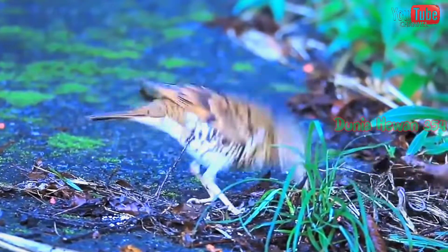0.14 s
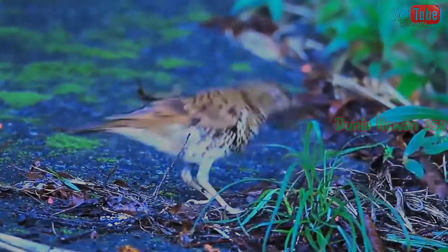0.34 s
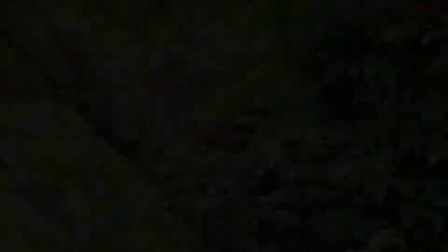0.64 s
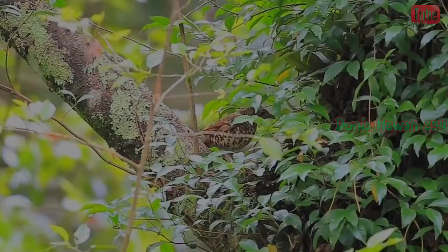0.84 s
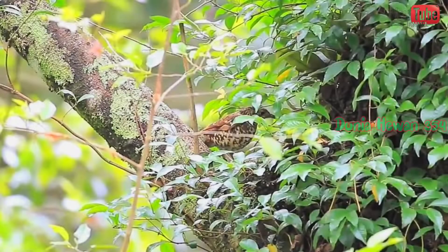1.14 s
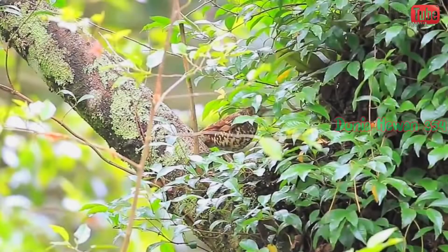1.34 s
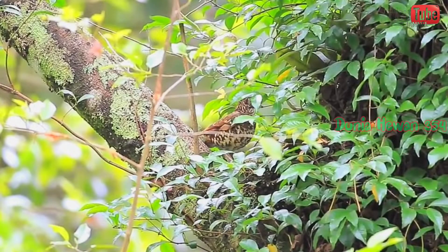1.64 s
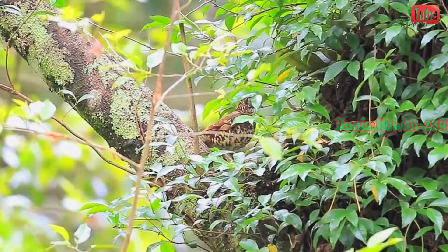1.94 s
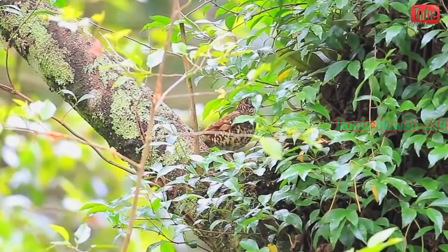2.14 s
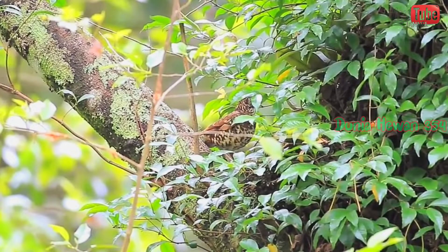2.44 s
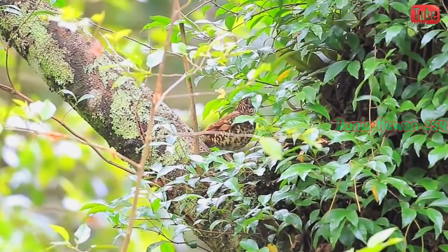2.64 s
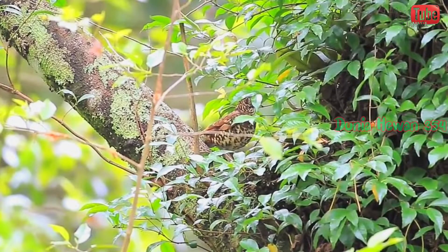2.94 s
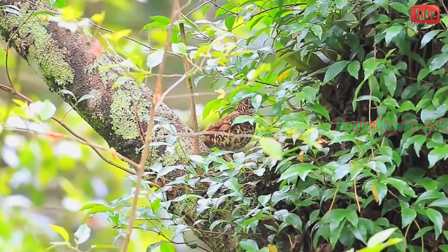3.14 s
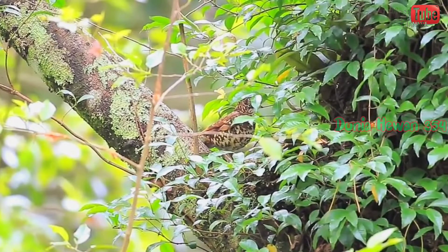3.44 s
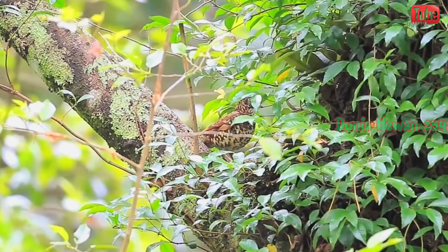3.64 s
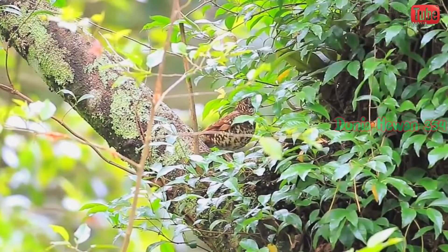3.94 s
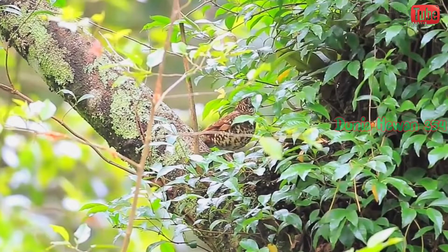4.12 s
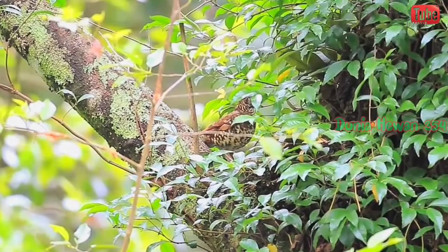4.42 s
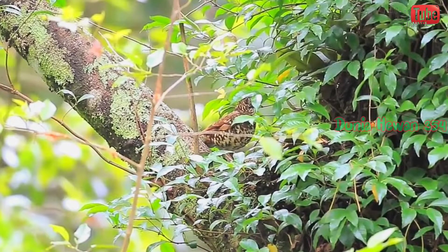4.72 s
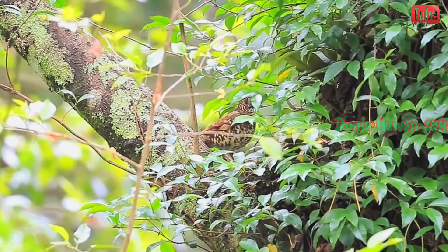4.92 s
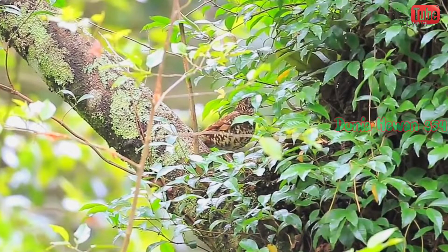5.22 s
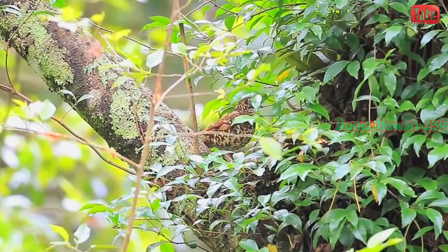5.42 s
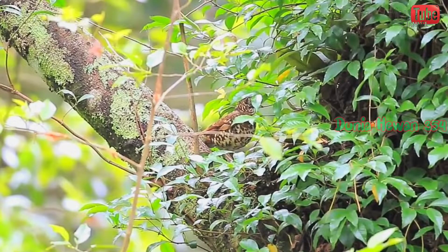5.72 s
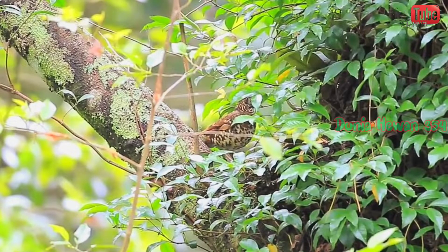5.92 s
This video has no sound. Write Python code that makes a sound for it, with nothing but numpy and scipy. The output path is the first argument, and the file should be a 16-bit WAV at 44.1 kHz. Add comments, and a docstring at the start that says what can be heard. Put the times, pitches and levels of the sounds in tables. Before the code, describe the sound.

Close on the left, a thrush sings six short phrases separated by pauses: clear sliding whistles, a rising note snapping into a throbbing fall, a buzz merging into a long high slide, a level whistle, a two-voiced duet and a thin rasp. Trunks and leaves scatter the notes. Soft air and a faint low drone lie beneath; the right channel is silent at first, then carries quiet air and distant falling chips.

```python
"""A thrush sings six short phrases in woodland, close by and on the left only; trunks and leaves scatter the song.
It opens with whistles over soft air and a faint drone; then the right side opens with quiet forest air
and faint, falling calls. The second phrase ends in a whip and a throbbing fall; in the third one side of
the syrinx buzzes into a high slide. A level whistle and a duet of the two sides follow, and a rasp ends it.
Voices are jittering near-sines with weak overtones and air hiss; air, rustles and bumps are shaped noise."""
import sys
import numpy as np
from scipy import signal
from scipy.fft import rfft, irfft, next_fast_len
from scipy.io import wavfile
from scipy.ndimage import uniform_filter1d, minimum_filter1d

SR = 44100
rng = np.random.default_rng(int(sys.argv[2]) if len(sys.argv) > 2 else 0)


def to_wav(sig):
    """Store sig (one row per channel, or 1-D mono) as 16-bit WAV at the path in sys.argv[1].

    Samples outside -1..1 are clipped; the rate is SR.
    """
    pcm = np.clip(np.atleast_2d(sig), -1, 1) * 32767
    pcm = np.round(pcm).astype(np.int16)
    wavfile.write(sys.argv[1], SR, pcm.T)  # frames by channels


N = 267687
T = np.arange(N) / SR  # time in seconds

# forest air on each side: hz, density_db_per_hz
LEFT_AIR = [(20, -72.5), (60, -78), (95, -74), (140, -79.5), (260, -79), (600, -80), (1200, -85),
            (2200, -87), (4000, -88.5), (7000, -95), (9000, -106), (12000, -121), (15000, -128)]
RIGHT_AIR = [(20, -103), (60, -89), (92, -79.5), (140, -91), (600, -93), (1200, -88.5), (2100, -88),
             (2700, -91.5), (3400, -109), (5500, -104), (7800, -106), (10000, -126), (15000, -137)]
# dull bumps on the left microphone: centre_s, half_length_s, level_db
DULL_BUMPS = [(0.772, 0.04, -40), (1.41, 0.023, -44), (2.327, 0.068, -51.5), (4.295, 0.031, -43),
              (4.49, 0.036, -51)]
# soft rustles in the leaves: centre_s, half_length_s, centre_hz, left_db, right_db
LEAF_RUSTLES = [(1.134, .03, 5500, -88, -58), (2.633, 0.022, 8950, -58, -74),
                (3.138, 0.052, 8680, -58, -75), (4.636, .006, 4500, -80, -55)]
# faint calls on the right, a chip and then a falling tail: chip_s, chip_top_hz, chip_db, tail_db
# (both levels before the blend of direct and scattered sound)
DISTANT_CALLS = [(.734, 5400, -37, -58), (2.196, 6200, -39, -41), (2.887, 6100, -38, -44),
                 (4.364, 5600, -57, -58), (5.392, 6400, -55, -61)]
# how the throat and open beak colour the overtones: hz, gain_db
BEAK_COLOUR = [(3000, 4), (5000, -2), (6800, 12.5), (8000, -1.5), (9000, 0), (11000, 1), (13500, -9),
               (15500, -15)]
# turbulent air that escapes with each note, before the note's own hiss_db: hz, density_db_per_hz
BREATH_HISS = [(300, -40), (2000, -49), (4500, -43.5), (6800, -36.5), (9800, -42.5), (11200, -53.5),
               (13500, -68.5)]
# one syrinx side buzzing into the high slide: start_s, length_s, centre_hz, peak_db
BUZZ_BURSTS = [(2.183, 0.025, 6460, -23), (2.206, 0.026, 6350, -11), (2.251, .030, 6150, -10),
               (2.302, .028, 6000, -13.5), (2.356, .028, 5670, -22.5), (2.418, .028, 5850, -17)]
# full whistles by name: contour rows of time_s, pitch_hz, level_db; then timbre of jitter_percent,
# second_harmonic_db, third_harmonic_db, hiss_db, woodland_echo_db, fourth_harmonic_db (re the third)
CONTOUR_WHISTLES = { "opening whistle": ([(0.087, 1894, -39.1), (0.106, 2360, -19.5), (0.143, 2567, -9.2),
                    (0.158, 2644, -2.3), (0.175, 2530, -5.3), (0.185, 2546, -4.4), (0.19, 2608, -26.0)],
                    (.25, -37.5, -51, -54, -20, 3)), "crest": ([(0.231, 2994, -27.7), (0.239, 3334, -9.1),
                    (0.263, 3535, -3.6), (0.278, 3380, -2.4), (0.307, 3262, -7.6), (0.31, 3438, -21.3)],
                    (.15, -33, -41, -53, -16, -22)), "long slide": ([(0.31, 3317, -12.7),
                    (0.315, 3261, -1.9), (0.34, 3291, -10.2), (0.356, 3258, -3.5), (0.369, 3228, -9.3),
                    (0.399, 3137, -8.5), (0.469, 3026, -13.7), (0.516, 2985, -25.5)],
                    (.15, -35, -45, -57, -17, -22)), "level whistle": ([(3.408, 1709, -29.4),
                    (3.416, 2549, -15.3), (3.422, 2903, -3.6), (3.432, 2998, -12.3), (3.447, 2907, 0.2),
                    (3.453, 2815, -5.5), (3.482, 2908, -1.8), (3.49, 2959, -15.2), (3.499, 3021, -8.4),
                    (3.505, 2954, -18.7)], (.12, -39.5, -39, -49, -11, -24)), }
# the other notes by name, each from one side of the syrinx, in four groups:
# timing: start_s, length_s
# pitch: first_hz, last_hz, arch_hz, scoop_hz, settling_s
# loudness: peak_db, rise_s, swell_db, fade_db
# timbre: jitter_percent, second_harmonic_db, third_harmonic_db, hiss_db, woodland_echo_db
GLIDE_NOTES = { "grace note": ((.221, .027), (4330, 3830, -75, 450, .002), (-4, .020, 20, 9),
               (.34, -23.5, -50, -31, -11.5)), "upper blip": ((.310, .018), (3720, 3760, 20, 0, .005),
               (-19, .008, 8, 3), (.5, -30, -50, -35, -10)), "rising whistle": ((1.1445, .060),
               (4560, 5400, -170, -2100, .003), (-12, .041, 19, 7), (.86, -24, -50, -25, -12.5)),
               "second rising voice": ((1.160, .036), (4480, 4900, -110, 0, .005), (-15, .027, 25, 2),
               (1.4, -15, -50, -43, -15)), "whip": ((1.204, .013), (4900, 2380, -600, 0, .005),
               (-1, .0075, 20, 12), (2.5, -26, -46, -28, -20)), "throbbing fall": ((1.216, .064),
               (1900, 1460, -130, 700, .010), (-9.3, .003, 0, 6.5), (2.2, -25, -36, -29, -22)),
               "high slide": ((2.194, .320), (7070, 6280, -55, 920, .029), (-6, .068, 19, 10),
               (.1, -22, -58, -36, -19.5)), "closing note": ((3.505, .026), (2950, 2640, 30, 0, .005),
               (-1, .005, 17, 10), (.5, -41, -43, -49, -10.5)), "upper flick": ((3.491, .036),
               (4120, 3540, 20, -100, .005), (-28, .010, 11, 1), (1.5, -24, -46, -22, -7)),
               "duet upper": ((4.401, .068), (3980, 4150, 175, -200, .006), (-14, .040, 23, 0),
               (.31, -33, -54, -37, -7)), "duet lower": ((4.443, .046), (3600, 3100, 90, -230, .006),
               (-8, .025, 26, 4), (.7, -38, -42, -34, -8.5)), "duet return": ((4.485, .052),
               (3700, 4290, 20, -500, .004), (-12.5, .035, 4, 3), (.8, -41, -54, -36, -4)),
               "rasp swoop": ((5.393, .034), (7850, 4450, 520, 0, .005), (-25, .020, 17, 3),
               (2.8, -24, -35, -17, -6)), "rasp climb": ((5.419, .036), (4750, 5400, -130, 0, .005),
               (-28, .008, 3, 7), (4, -17, -35, -18, -7)), "rasp lower": ((5.408, .142),
               (6400, 6400, 0, 600, .006), (-29.5, .045, 2, 0), (3.8, -17, -50, -42, -4)),
               "rasp upper": ((5.434, .114), (7600, 7250, 130, 0, .005), (-30.5, .015, 10, 7),
               (3.2, -24, -50, -25, -2)), }
# notes that throb, by name: first_dip_s, rate_hz, depth_db
NOTE_THROBS = {"throbbing fall": (1.226, 51, 16)}

RIGHT_OPENS_S = .615
TOP_HZ = 15400
WOOD_T60_S, WOOD_BUILD_S = .39, .004
LEAF_T60_S, LEAF_BUILD_S = .1, .0015
EASE_S = .002  # muscle inertia rounds the corners of a note
RELEASE_SHARE, RELEASE_DB = .2, 9  # a glide note dies down over its last part
BUZZ_RATE_HZ, BUZZ_SWEEP = 100, .24  # sweep as a share of the centre pitch
BUZZ_LIFT, BUZZ_LIFT_S = .022, .015  # peak pitch lift as a share, and the time to reach it
CHIP_HALF_S, CHIP_BEND_HZ = .009, 350
TAIL_DELAY_S, TAIL_HZ = .014, 4950
TAIL_SAG_HZ_PER_S, TAIL_FADE_DB_PER_S = 12000, 270


def undb(db):
    """Decibels to gain."""
    return 10 ** (np.asarray(db) / 20)


def noise(spectrum):
    """White noise shaped to a spectrum given in dB per Hz, drawn on a log frequency axis."""
    hz, db = np.transpose(spectrum)
    f = np.maximum(np.fft.rfftfreq(N, 1 / SR), 1)
    shape = undb(np.interp(np.log(f), np.log(hz), db))
    return irfft(rfft(rng.standard_normal(N)) * shape, N) * np.sqrt(SR / 2)


def band(centre_hz, width_hz):
    """Noise in a bell-shaped band, rms 1; centred on zero it is a random wander."""
    size = next_fast_len(N, real=True)
    f = np.fft.rfftfreq(size, 1 / SR)
    bell = np.exp(-.5 * ((f - centre_hz) / width_hz) ** 2)
    x = irfft(rfft(rng.standard_normal(size)) * bell, size)[:N]
    return x / x.std()


def swell(centre_s, half_s):
    """A smooth rise and fall around a moment."""
    return np.exp(-((T - centre_s) / half_s) ** 2)


def ease(x):
    """Round the corners of a pitch or amplitude curve."""
    return uniform_filter1d(x, max(int(EASE_S * SR), 1))


def air(spectrum):
    """Steady forest air: shaped noise that sways slightly in level."""
    sway_db = .25 * band(0, 2)
    return noise(spectrum) * undb(sway_db)


def drone():
    """A faint low drone: noise in so narrow a band that its level comes and goes."""
    return undb(-62) * band(94, 5)


def bumps():
    """Soft thuds: very low noise under brief swells."""
    level = sum(undb(db) * swell(s, half) for s, half, db in DULL_BUMPS)
    return band(25, 16) * level


def rustles():
    """Leaves brushing: brief swells of high noise, shared between both sides."""
    out = 0
    for s, half, hz, left_db, right_db in LEAF_RUSTLES:
        sides = undb([[left_db], [right_db]])
        out = out + swell(s, half) * band(hz, 2200) * sides
    return out


def echoes(x, t60_s, build_s):
    """Many small echoes from trunks and leaves: a noise tail that builds up and dies away."""
    t = T[T < .9]
    envelope = undb(-60 * t / t60_s) * (1 - np.exp(-t / build_s))
    tail = rng.standard_normal(len(t)) * envelope
    return signal.fftconvolve(x, tail / np.linalg.norm(tail))[:N]


def woodland(x):
    """The long answer of the wood."""
    return echoes(x, WOOD_T60_S, WOOD_BUILD_S)


def foliage(x):
    """The quick smear from nearby leaves."""
    return echoes(x, LEAF_T60_S, LEAF_BUILD_S)


def far_calls():
    """Thin arched sine chips, each with a tail sliding down in pitch, blurred by the leaves in between."""
    calls, waver = 0, 1 + .012 * band(0, 330)
    for s, top_hz, chip_db, tail_db in DISTANT_CALLS:
        age = np.maximum(T - s - TAIL_DELAY_S, 0)
        arch_hz = top_hz - CHIP_BEND_HZ * ((T - s) / CHIP_HALF_S) ** 2
        chip_hz = np.maximum(arch_hz, TAIL_HZ)
        hz = np.maximum(chip_hz - TAIL_SAG_HZ_PER_S * age, 0)
        chip = undb(chip_db) * swell(s, CHIP_HALF_S)
        tail = undb(tail_db - TAIL_FADE_DB_PER_S * age) * (1 - np.exp(-age / .004))  # 4 ms attack
        calls = calls + (chip + tail) * np.sin(2 * np.pi * np.cumsum(hz * waver) / SR)
    return undb(-4) * calls + undb(-5) * foliage(calls) + undb(-14) * woodland(calls)


def syrinx(hz, second_db, third_db, fourth_db=-13):
    """A vibrating membrane: nearly a sine, with weak overtones coloured by the throat and beak."""
    phase = 2 * np.pi * np.cumsum(hz) / SR
    beak_hz, beak_db = np.transpose(BEAK_COLOUR)
    # the fourth and fifth harmonics step on from the third
    harmonics_db = [second_db, third_db, third_db + fourth_db, third_db + 2 * fourth_db]
    out = np.sin(phase)
    for k, db in enumerate(harmonics_db, 2):
        gain = undb(db + np.interp(k * hz, beak_hz, beak_db))
        out = out + gain * np.sin(k * phase) * (k * hz < SR / 2)
    return out


def buzz():
    """Bursts of tiny, uneven upward chirps; also returns how far each chirp chokes the whistling side."""
    hz, loud, choke = np.zeros((3, N))
    uneven = .09 * band(0, 40)  # in chirp cycles
    rough = .028 * band(0, 600)  # as a share of the pitch
    for start, length, centre, db in BUZZ_BURSTS:
        on = (T >= start) & (T < start + length)
        age = T[on] - start
        cycle = (age * BUZZ_RATE_HZ + uneven[on]) % 1
        opening = np.sin(np.pi * cycle) ** 2
        burst = np.sin(np.pi * age / length) ** .9
        hz[on] = centre * (1 + BUZZ_SWEEP * (cycle - .5) + rough[on])
        loud[on] = undb(db) * opening * burst
        choke[on] = np.cos(np.pi * (cycle - .3)) ** 2 * np.sqrt(1 - age / length)
    chirps = loud * syrinx(hz, -19, -np.inf)  # second harmonic only
    return chirps, uniform_filter1d(choke, size=90)


def lift():
    """Each buzz pushes the whistling side sharp by a share of its pitch, which then sinks back."""
    ages = [np.maximum(T - start, 0) / BUZZ_LIFT_S for start, *_ in BUZZ_BURSTS]
    return BUZZ_LIFT * np.max([age ** 2 * np.exp(2 * (1 - age)) for age in ages], axis=0)


def gesture(contour):
    """Pitch and amplitude drawn through a contour, corners eased by the inertia of the muscles."""
    s, hz, db = np.transpose(contour)
    loud = undb(np.interp(T, s, db)) * (T >= s[0]) * (T <= s[-1])
    return ease(np.interp(T, s, hz)), ease(loud)


def note(timing, pitch, loudness):
    """Pitch scoops onto an arched glide; loudness swells to a rounded peak, fades and is released."""
    start, length = timing
    first, last, arch, scoop, settling = pitch
    peak_db, rise, swell_db, fade_db = loudness
    age = np.clip(T - start, 0, length)
    part = age / length
    glide = first + (last - first) * part + 4 * arch * part * (1 - part)
    hz = glide + scoop * np.exp(-age / settling)
    swelling = np.maximum(1 - age / rise, 0)
    fading = np.maximum(age - rise, 0) / max(length - rise, 1 / SR)
    release = np.maximum(1 - (1 - part) / RELEASE_SHARE, 0)
    db = peak_db - swell_db * swelling ** 2 - fade_db * fading ** 2 - RELEASE_DB * release ** 2
    return hz, ease(undb(db) * (T >= start) * (T <= start + length))


def throb(dip_s, rate_hz, depth_db):
    """Regular, narrow dips in loudness."""
    dip = np.cos(np.pi * rate_hz * (T - dip_s)) ** 4
    return undb(-depth_db * dip)


def song():
    """Pitch, amplitude and timbre of every note."""
    for contour, timbre in CONTOUR_WHISTLES.values():
        yield *gesture(contour), timbre
    for name, (timing, pitch, loudness, timbre) in GLIDE_NOTES.items():
        hz, loud = note(timing, pitch, loudness)
        if name in NOTE_THROBS:
            loud = loud * throb(*NOTE_THROBS[name])
        yield hz, loud, timbre


def thrush():
    """Jittering whistles with a little air hiss beside the buzz; near leaves smear them, the wood answers."""
    chirps, choke = buzz()
    direct, scattered = chirps, 0
    hiss = noise(BREATH_HISS)
    sharp = 1 + lift() + .026 * choke  # each chirp tugs the whistle sharp as it chokes it
    for hz, loud, timbre in song():
        jitter_percent, second_db, third_db, hiss_db, echo_db, *fourth_db = timbre
        jitter = jitter_percent / 100 * band(0, 450)
        tone = syrinx(hz * (sharp + jitter), second_db, third_db, *fourth_db)
        flutter = undb(1.4 * band(0, 68))
        voice = loud * (1 - choke) * flutter * (tone + undb(hiss_db) * hiss)
        direct = direct + voice
        scattered = scattered + undb(echo_db) * voice
    near = foliage(undb(-4) * scattered + undb(-8) * chirps)
    return direct + near + woodland(scattered + undb(-18) * chirps)


def scene():
    """The singer on the left, the faint calls on the right, rustles across both."""
    left = air(LEFT_AIR) + drone() + bumps() + thrush()
    right = (air(RIGHT_AIR) + far_calls()) * (T > RIGHT_OPENS_S)
    return np.array([left, right]) + rustles()


def record(dry):
    """A quick limiter holds the loudest notes under full scale, then a steep low-pass cuts the top."""
    gain = .94 / np.maximum(np.abs(dry), .94)
    gain = uniform_filter1d(minimum_filter1d(gain, size=400), size=400)
    low_pass = signal.ellip(8, .1, 80, TOP_HZ, fs=SR, output="sos")
    return signal.sosfilt(low_pass, dry * gain)


dry = scene()
out = record(dry)
to_wav(out)
```